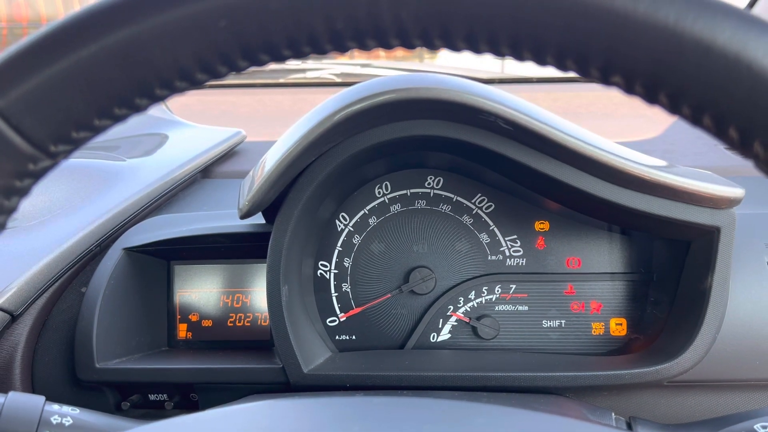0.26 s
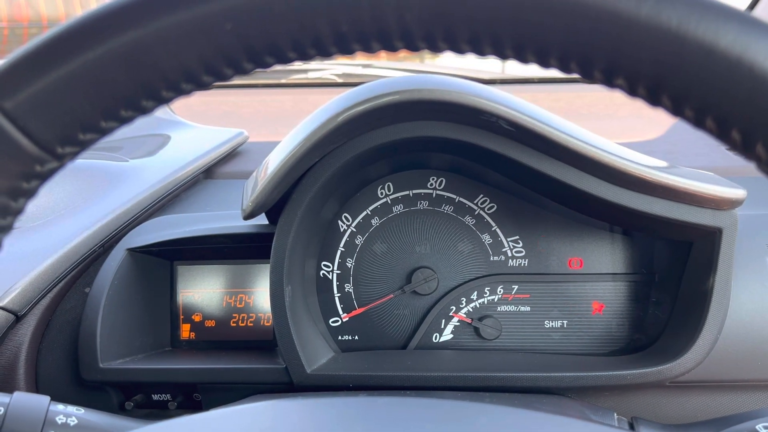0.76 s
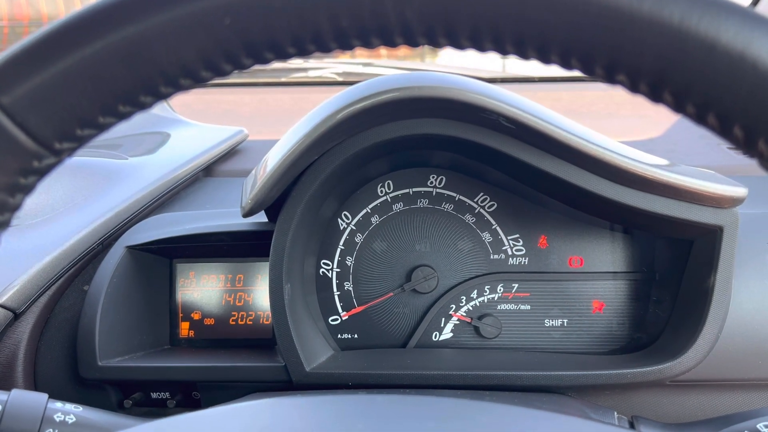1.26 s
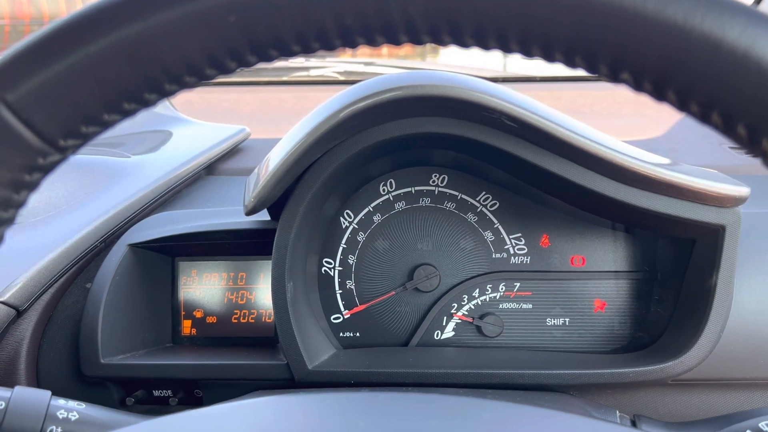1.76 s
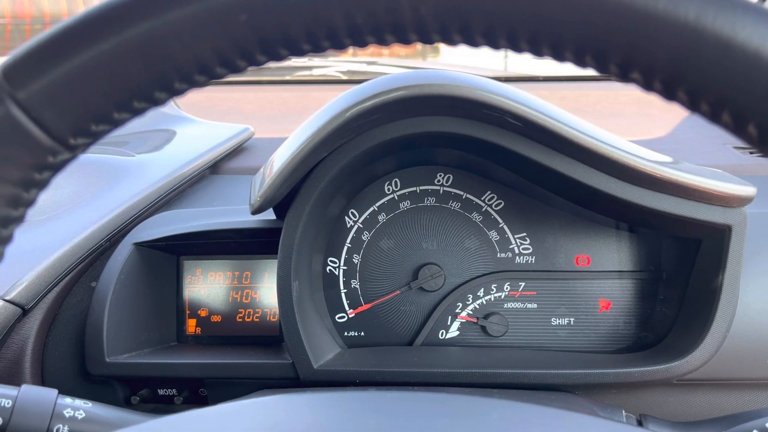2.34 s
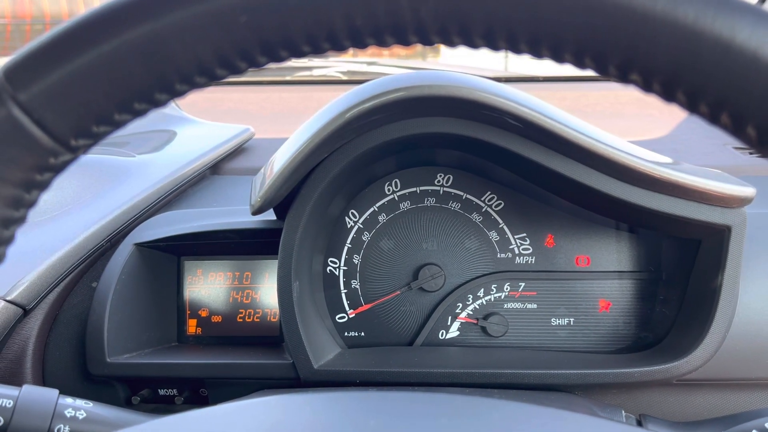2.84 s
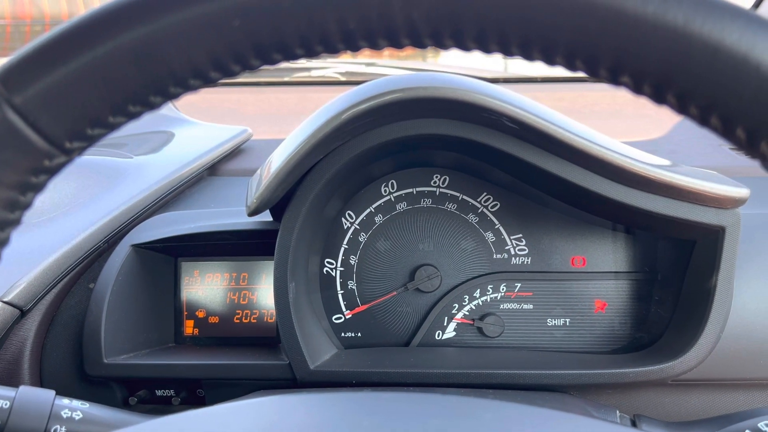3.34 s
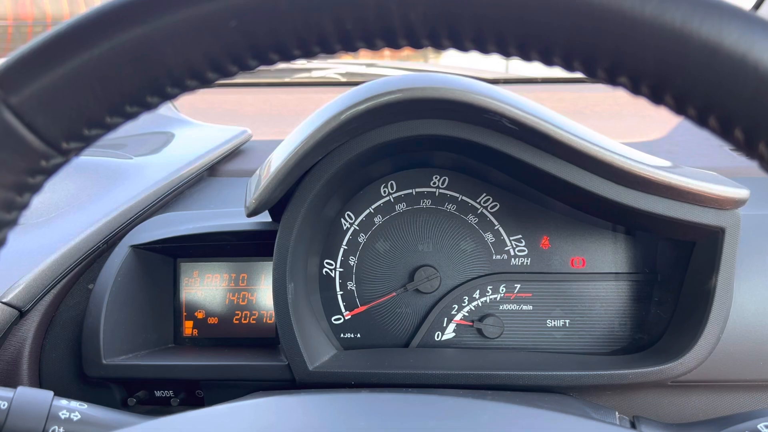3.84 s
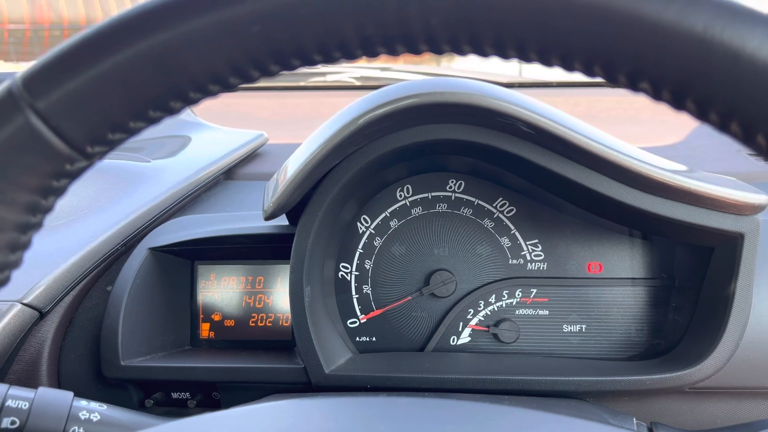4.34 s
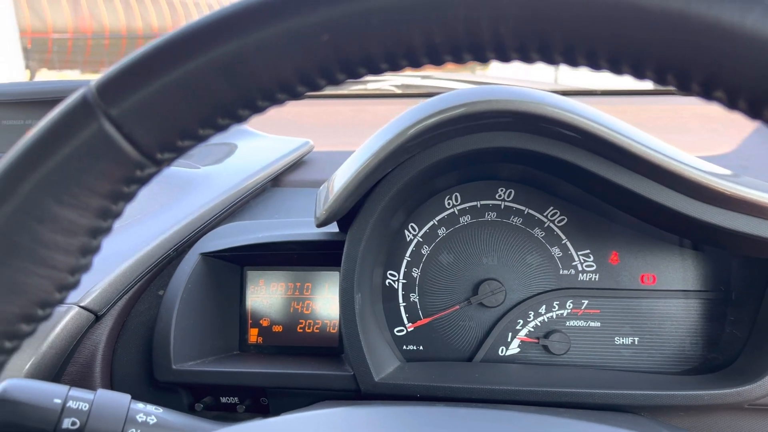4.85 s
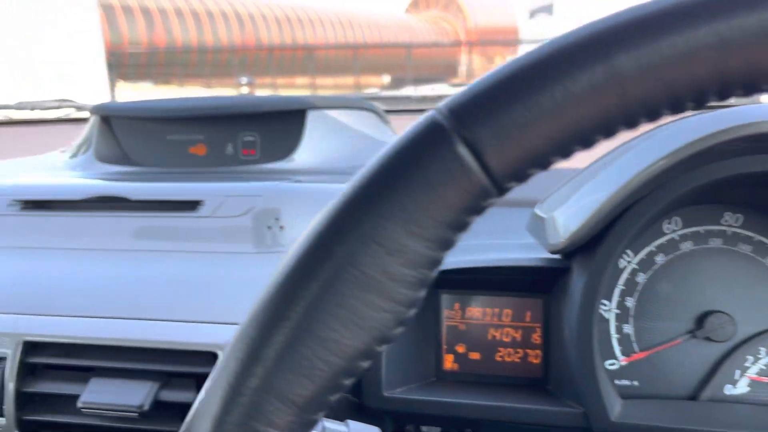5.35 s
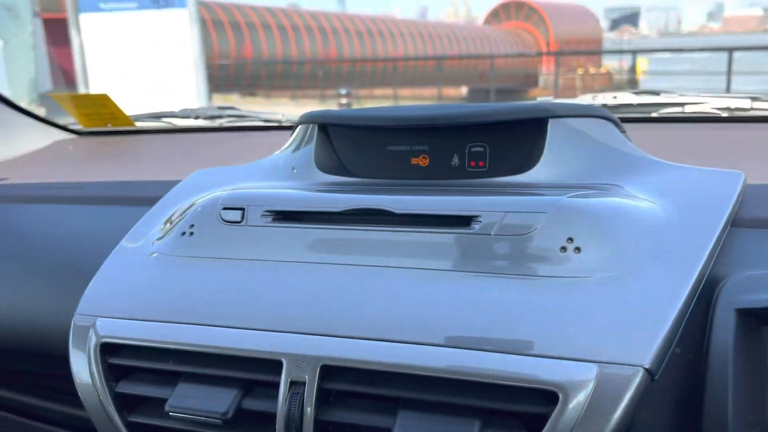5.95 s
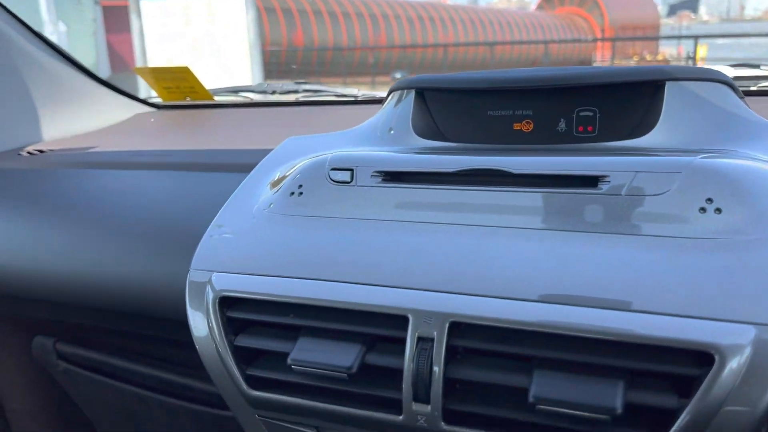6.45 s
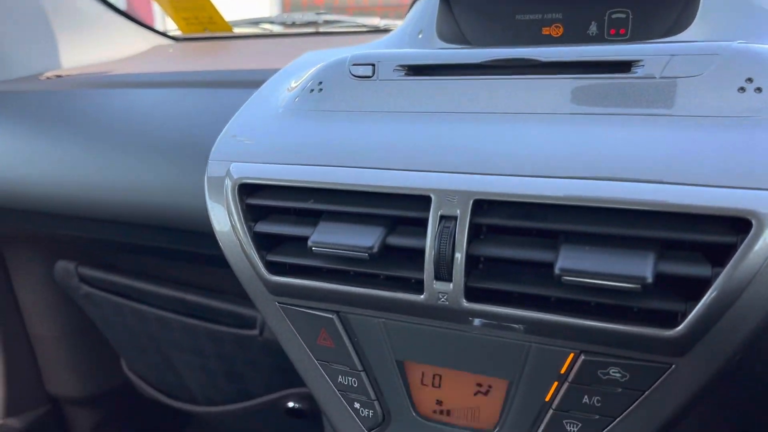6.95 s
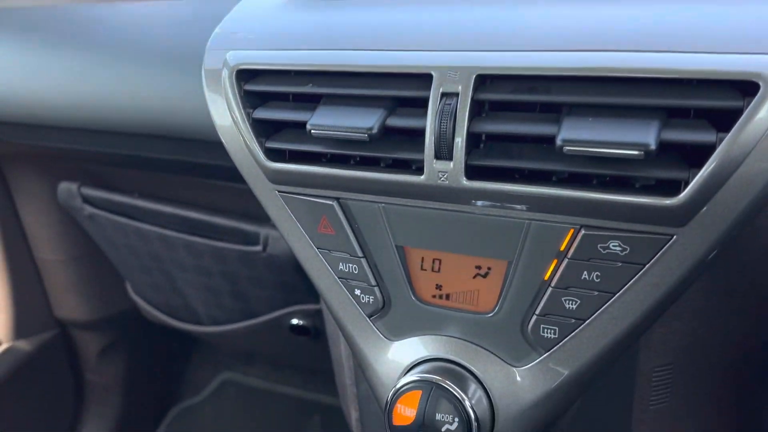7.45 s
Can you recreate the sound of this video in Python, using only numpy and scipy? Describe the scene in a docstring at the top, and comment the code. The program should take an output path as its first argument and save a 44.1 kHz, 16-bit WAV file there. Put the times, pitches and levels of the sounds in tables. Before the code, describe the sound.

From the driver's seat of a small parked car, a three-cylinder engine runs at a fast cold idle, low and muffled with soft clatter and faint ticks at left. After a second the heater fan swells into a broad airy rush. The engine gradually slows and thumps unevenly in brief spells, while the handheld stereo microphone turns towards the centre vents. The air becomes fuller, and dull low knocks close it.

```python
"""A small three-cylinder engine settles from a fast cold idle, heard from the driver's seat.
Sine lines at multiples of crank speed slide down through body resonances, over noise clatter and struck thuds;
faint ticks ring short modes on the left. After a second the heater blower spins up: shaped noise rushes from
the vents, with breathy duct tones. The engine lopes in three short spells and the microphone swings towards
the centre vents. A few dull knocks, decaying low sines, come at the end."""
import sys
import numpy as np
from scipy import signal
from scipy.fft import rfft, irfft, next_fast_len
from scipy.io import wavfile

SR = 44100
rng = np.random.default_rng(int(sys.argv[2]) if len(sys.argv) > 2 else 0)


def dump(signal):
    """Clip the signal to [-1, 1] and save it as 16-bit WAV at the path in sys.argv[1]."""
    limited = np.clip(np.atleast_2d(signal).T, -1, 1)
    pcm = np.round(limited * 32767).astype(np.int16)
    wavfile.write(sys.argv[1], SR, pcm)


N = 339746

# crank speed as the cold idle settles: (time [s], speed [rpm])
SPEED = [(0, 1815), (.5, 1715), (.9, 1650), (1.5, 1490), (2.1, 1350), (2.4, 1280), (2.7, 1240), (3.3, 1210),
         (3.6, 1185), (3.9, 1140), (4.2, 1085), (4.4, 1020), (4.7, 970), (5.1, 920), (5.3, 893), (5.5, 875),
         (6.4, 815), (6.8, 810), (7.7, 820)]
# floor-pan and cavity modes, struck by firings and thumps: (pitch [Hz], level [dB], t60 [s])
BODY_MODES = [(75.4, -1, 0.18), (81, -1.5, 0.18), (86.6, -4.5, 0.24), (102, -9.5, .15), (136, -9, 0.054),
              (153.2, -5, 0.15), (179.3, -3.5, 0.2), (203.7, -11, 1)]
# how sound reaches the two microphone ports, from the side vents (also used for the body roar) and the centre:
# (frequency [Hz], likeness [0-1], right lead [rad], left minus right [dB])
SIDE_IMAGE = [(78, 1, 0, -1.3), (167, 1, 0.66, -0.5), (284, 0.99, -0.17, -1.3), (446, 0.75, -1.5, 6.5),
              (700, 0.74, 0.42, -4), (940, 0.58, -3, -1), (1400, 0.12, -2.5, 1.5), (1910, 0.29, -2.5, 2.5),
              (2800, 0.26, -1, -1.7), (4200, 0.33, -0.3, 2.5), (6500, 0.69, 1, 0.5), (8000, 0.85, 0.5, 1.5),
              (8700, 0.92, 2, 0.2), (13000, 0.88, -1, 1.5)]
CENTRE_IMAGE = [(80, 1, -2, -1), (170, 0.85, 0.3, 0.5), (294, 0.9, -0.09, 0.5), (450, 0.75, 0.5, 0.5),
                (690, 0.7, -0.6, -8.5), (1020, 0.56, -0.1, 2), (1350, 0.54, 0, 0.5), (1900, 0.4, 0.9, 0.4),
                (2820, 0.87, -1.64, 1.5), (4270, 0.63, -1.2, 3), (6500, 0.57, 0.4, -1),
                (7950, 0.82, -0.1, 1), (9000, 0.86, 3, 0), (13000, 0.88, 0.5, 0)]
# microphone turning across the dash: (time [s], facing the centre vents [0-1])
FACING = [(0, 0.01), (5, 0.34), (5.5, 0.59), (6, 0.93), (6.45, 0.96), (6.65, 0.99), (7.7, 0.99)]
WARM_RPM = 800   # reference speed for the engine levels
RUSH_DB_PER_OCT = 9   # rush and duct tones, per octave of airflow


def from_db(db):
    """Decibels to gain."""
    return 10 ** (np.asarray(db) / 20)


def rms_one(x):
    """Scale to rms 1."""
    return x / np.sqrt(np.mean(x ** 2) + 1e-20)


def in_time(rows):
    """Columns of a curve table, one value per sample."""
    s, *columns = np.transpose(rows)
    return [np.interp(np.arange(N) / SR, s, c) for c in columns]


def at_hz(rows, hz):
    """Columns of a frequency table, read on a log axis."""
    f, *columns = np.transpose(rows)
    return [np.interp(np.log(hz), np.log(f), c) for c in columns]


def drift(rate):
    """Slow chance of spread 1: noise twice through a one-pole low-pass at rate [Hz]."""
    # drawn at a fortieth of the sample rate, then interpolated; the first 4000 values let the filter settle
    r = np.exp(-80 * np.pi * rate / SR)
    noise = rng.standard_normal(N // 40 + 4002)
    slow = signal.lfilter([1], [1, -2 * r, r * r], noise)[4000:]
    return np.interp(np.arange(N) / 40, np.arange(len(slow)), rms_one(slow))


def ring(clicks, hz, t60):
    """A two-pole resonator: a unit click sets a decaying sine of initial height 1 ringing."""
    r = from_db(-60 / (t60 * SR))
    w = 2 * np.pi * hz / SR
    return signal.lfilter([0, np.sin(w)], [1, -2 * r * np.cos(w), r * r], clicks + 1e-18)


def stereo_noise(colour, image, ducts=()):
    """Coloured noise on both ports; the right one holds a phase-turned share of the left. Mid rms 1."""
    size = next_fast_len(N)
    hz = np.maximum(np.arange(size // 2 + 1) * SR / size, 1)
    level_db, = at_hz(colour, hz)
    for centre_hz, width_hz, lift_db in ducts:
        level_db = level_db + lift_db / (1 + (2 * (hz - centre_hz) / width_hz) ** 2)
    alike, lead, balance_db = at_hz(image, hz)
    alike = np.clip(alike, 0, 1)
    shared, own = rfft(rng.standard_normal((2, size)))
    left = shared * from_db(level_db + balance_db / 2)
    right = alike * np.exp(1j * lead) * shared + np.sqrt(1 - alike ** 2) * own
    right = right * from_db(level_db - balance_db / 2)
    pair = irfft(np.array([left, right]), size)[:, :N]
    return pair / np.sqrt(np.mean(pair.mean(axis=0) ** 2))


def crank_angle():
    """Crank phase in radians; the idle hunts a little around its set speed."""
    rpm = in_time(SPEED)[0] * (1 + 0.0025 * drift(3.33))
    return 2 * np.pi * np.cumsum(rpm / 60) / SR


def octaves_up():
    """Engine speed in octaves above the warm reference."""
    return np.log2(in_time(SPEED)[0] / WARM_RPM)


def airflow_octaves():
    """Blower airflow as octaves relative to full speed (0 at full, negative below)."""
    start_s, spin_up_s = 1.043, 0.34
    age = np.maximum(np.arange(N) / SR - start_s, 0) / spin_up_s
    airflow = 1 - np.exp(-age ** 2 / (1 + age))
    return np.log2(np.maximum(airflow, .05))   # a trickle remains before the start


def engine_orders(crank):
    """Clean lines on the main orders, wavering weaker ones between them; the right port leads a little."""
    # main lines, 1.5 being the firing rate, before line level and body gain:
    # (multiple of crank speed [ratio], level at warm reference [dB], slope [dB per octave of engine speed])
    main_orders = [(1.5, -49, 1), (2, -68, 6.5), (3, -50.5, 1), (3.5, -67.5, 12.5), (4.5, -46, 1),
                   (6, -51, 4.5), (6.5, -58.5, 6), (7.5, -50.5, -3), (9, -45, -14)]
    # unequal cylinders leave weaker orders between: (multiple of crank speed [ratio], relative level [dB])
    side_orders = [(2.5, -12), (4, -6), (5, -1), (5.5, -4), (7, -3), (8, -4), (8.5, -7), (10, -8), (11, -3)]
    # level of the clean lines: (time [s], level [dB])
    line_level = [(0, 3), (.3, -3.5), (.47, -5.5), (.75, 1.5), (1.7, 2.5), (2.2, -1.5), (2.6, -0.5),
                  (3.3, 2.5), (3.6, -9), (3.9, 6.5), (4.3, -2.5), (4.9, 0), (5.5, -2.5), (7.7, -1.5)]
    # how the body passes a low tone into the cabin: (frequency [Hz], gain [dB])
    body_gain = [(14, -26.5), (20, -12), (23, -6), (26.5, 11), (30, -6), (33, 8.5), (36, 11.5), (40, 13.5),
                 (46, 5), (52, 3), (55, -8.5), (58, -7), (60.5, 2.5), (62, 6), (67, 3), (72, 0.5),
                 (78, -3.5), (84, 1.5), (90, -10), (97, -11), (108, -11.5), (120, -7.5), (132, 0), (145, 1),
                 (160, -4.5), (180, 0), (215, -4.5)]
    turns_hz = in_time(SPEED)[0] / 60
    line_db, = in_time(line_level)
    up = octaves_up()
    lead = np.array([[-.09], [.09]])   # left, right [rad]
    out = np.zeros((2, N))
    for order, level_db, slope_db in main_orders:
        level_db = level_db + line_db + slope_db * up + at_hz(body_gain, order * turns_hz)[0]
        # the lines stay nearly in step, so that each firing is felt as a beat
        phase = order * crank + rng.normal(0, .5) + lead
        out -= from_db(level_db + 1.4 * drift(2.0)) * np.cos(phase)
    uneven_db = -49.5 - 12 * up
    for order, level_db in side_orders:
        # no two burns are alike, so these lines swell and fade on their own
        phase = order * crank + rng.uniform(0, 2 * np.pi) + lead
        out += from_db(uneven_db + level_db + 3.0 * drift(0.64)) * np.sin(phase)
    # the bulkhead lets little through above the body modes
    out = signal.sosfilt(signal.butter(4, 235, fs=SR, output="sos"), out)
    return np.sqrt(2) * out * from_db([[-.3], [.3]])


def shake(crank):
    """The block shakes once per crank turn, a soft low sine that is strongest while the idle is fast."""
    # (time [s], level [dB rms])
    shake_level = [(0, -45), (.5, -61), (.9, -43.5), (1.3, -39), (1.75, -46), (2.1, -62), (2.8, -68.5),
                   (7.7, -80.5)]
    return np.sqrt(2) * from_db(in_time(shake_level)[0]) * np.sin(crank + rng.uniform(0, 2 * np.pi))


def panel_hum():
    """A floor panel hums: a nearly clean low sine that surges and slides in pitch."""
    # (time [s], pitch [Hz], level before the slow chance [dB rms])
    hum_curve = [(.3, 77.9, -61), (.85, 76.46, -45), (1.2, 75.15, -44), (1.6, 70.7, -46),
                 (2.1, 71.4, -71.5), (3.55, 76.43, -72), (3.85, 75.7, -50), (4.3, 73.76, -41),
                 (4.55, 71.06, -49), (4.9, 70.4, -34), (5.15, 68.7, -40), (5.4, 69, -70)]
    hz, level_db = in_time(hum_curve)
    phase = 2 * np.pi * np.cumsum(hz) / SR + rng.uniform(0, 2 * np.pi)
    return np.sqrt(2) * from_db(level_db + 2.9 * drift(4)) * np.sin(phase)


def rumble(crank):
    """A noise roar in the body that rises with the blower, and an uneven soft thud from every firing."""
    # (frequency [Hz], density [dB per Hz])
    roar_colour = [(12, -70), (30, -38), (48, -15), (80, 1.5), (125, -6), (165, -4), (195, -11.5),
                   (235, -21.5), (300, -53), (500, -120)]
    roar_db = -46.5 + 7 * 2 ** airflow_octaves()   # 7 dB lift at full airflow
    thud_db = -44 - 5.5 * octaves_up()
    fired = np.diff(np.floor(1.5 * crank / (2 * np.pi)), prepend=0) > 0
    # a steady part and a chance felt by all modes; each mode then adds its own chance
    push = fired * (.8 * rng.standard_normal(N) - 1.3)
    thuds = np.zeros(N)
    for hz, level_db, t60 in BODY_MODES:
        thuds += from_db(level_db) * ring(push + fired * rng.standard_normal(N), hz, t60)
    thuds = rms_one(signal.sosfilt(signal.butter(4, 260, fs=SR, output="sos"), thuds))
    # the left port hears them 18 samples later
    thuds = np.array([np.roll(thuds, 18), thuds]) * from_db([[-.5], [.5]])
    roar = from_db(roar_db) * stereo_noise(roar_colour, SIDE_IMAGE)
    return roar + from_db(thud_db) * thuds


def engine_bay(crank):
    """Valve and intake clatter: coloured noise that pulses slightly at the firing rate."""
    # (frequency [Hz], density [dB per Hz])
    bay_colour = [(40, -60.5), (150, -24.5), (260, -1), (360, -3.5), (392, -4.5), (442, -17.5), (515, -6),
                  (665, -11.5), (700, -11.5), (1210, -14.5), (1340, -19.5), (1820, -13), (2200, -21.5),
                  (2480, -30), (3600, -38), (4440, -41.5), (4910, -44.5), (15400, -68.5)]
    # how the bay reaches the ports:
    # (frequency [Hz], likeness [0-1], right lead [rad], left minus right [dB])
    bay_image = [(80, 0.99, 0.2, -0.6), (170, 0.99, 0.5, -1.1), (300, 0.71, 0.2, -0.1),
                 (450, 0.4, 0.0, 0.3), (680, 0.6, 0.1, -3.9), (1000, 0.37, -2.0, -0.8),
                 (1350, 0.03, 1.0, 4.5), (1900, 0.61, -2.1, 11.6), (2800, 0.04, -1.5, 7.8),
                 (4200, 0.24, -1.0, 13.9), (6500, 0.32, 0.3, 5.0), (7800, 0.41, 0.8, 4.9),
                 (9000, 0.39, 1.7, 0.2), (13000, 0.73, 0.0, -0.0)]
    # a faint rough whine, a dip and a hiss peak: (centre [Hz], width [Hz], lift [dB])
    bay_peaks = [(4535, 200, 11), (5340, 750, -4), (7170, 1400, 8)]
    level_db = -60.5 + 5.5 * octaves_up() + .5 * drift(3.7)
    pulse = 1 + .05 * np.cos(1.5 * crank)
    return from_db(level_db) * pulse * stereo_noise(bay_colour, bay_image, bay_peaks)


def ticking():
    """Each tick, and two weaker bounces after it, strike a few short modes with strengths of its own."""
    # faint ticks on the left, in short runs, as from a small valve: (time [s], strike level [dB])
    tick_times = [(.092, -66), (.132, -64), (.172, -68), (.212, -67), (.722, -63), (.762, -66), (.785, -65),
                  (.808, -64), (.85, -62), (.89, -63), (1.051, -66), (1.09, -60.5), (1.13, -63),
                  (1.17, -67), (1.36, -61), (1.4, -62), (1.45, -69), (1.69, -64), (1.73, -69)]
    # (pitch [Hz], level [dB], t60 [s])
    tick_modes = [(2550, 4, .012), (2850, 3, .011), (3200, 1, .01), (3550, 1, .01), (3900, 0, .009),
                  (4250, -1, .009)]
    s, strike_db = np.transpose(tick_times)
    first_bounce = s + rng.uniform(.012, .02, len(s))
    second_bounce = s + rng.uniform(.022, .036, len(s))
    s = np.r_[s, first_bounce, second_bounce]
    strike_db = np.r_[strike_db, strike_db - 4, strike_db - 7]
    strengths_db = rng.normal(0, 1.8, (len(s), len(tick_modes)))
    smear = rng.uniform(0, .0015, strengths_db.shape)   # the modes do not start together [s]
    out = np.zeros(N)
    for k, (hz, level_db, t60) in enumerate(tick_modes):
        clicks = np.zeros(N)
        at = ((s + smear[:, k]) * SR).astype(int)
        clicks[at] = from_db(strike_db + level_db - 5 + strengths_db[:, k])
        out += ring(clicks, hz, t60)
    muffled = signal.sosfilt(signal.butter(4, [2300, 4500], "band", fs=SR, output="sos"), out)
    return muffled * from_db([[4], [-9]])


def blower():
    """Turbulent air through the ducts: noise from two groups of vents, louder and brighter with airflow."""
    # colour of each group of vents: (frequency [Hz], density [dB per Hz])
    side_vents = [(40, -66.5), (120, -34.5), (200, -12), (231, -11), (309, 1.5), (364, -11.5), (437, -15.5),
                  (676, -11.5), (1110, -12.5), (1400, -16.5), (3350, -33), (5680, -44), (8020, -46),
                  (8950, -45.5), (10300, -84), (15400, -62)]
    centre_vents = [(40, -76), (120, -45.5), (200, -12), (293, 4.5), (371, -10.5), (506, -10.5),
                    (782, -16.5), (1230, -15.5), (1350, -16.5), (1910, -18.5), (5680, -36), (8170, -44),
                    (9110, -37.5), (9980, -86.5), (12900, -54.5), (15400, -57)]
    # duct resonances and dips: (centre [Hz], width [Hz], lift [dB])
    side_duct = [(656, 70, 1.5), (580, 32, -5.5), (950, 54, 1), (1120, 60, -8), (1210, 60, 2),
                 (1300, 50, -6.5), (1390, 150, 1), (1840, 87, -2.5), (2000, 1200, 3), (2065, 46, 3),
                 (2160, 54, 4.5), (2270, 90, -5.5), (2500, 70, -6.5), (2490, 71, 7.5), (2670, 82, -7),
                 (2750, 90, 4.5), (2920, 72, -8.5), (3410, 57, 6.5), (4560, 810, 2.5), (5650, 1300, -7)]
    centre_duct = [(667, 97, 5.5), (790, 40, -1.5), (955, 200, 5), (1320, 87, -2.5), (1410, 27, 4.5),
                   (1490, 59, -6), (1535, 35, 6), (2170, 650, -2), (3450, 130, 1), (4670, 1800, 1),
                   (5750, 1780, -10.5)]
    flow, facing = airflow_octaves(), in_time(FACING)[0]
    # the air buffets lightly: half a dB of slow chance on each group
    side = from_db(-47 + 0.5 * drift(7)) * stereo_noise(side_vents, SIDE_IMAGE, side_duct)
    centre = from_db(-43.5 + 0.5 * drift(7)) * stereo_noise(centre_vents, CENTRE_IMAGE, centre_duct)
    # equal-power crossfade as the microphone turns
    air = from_db(RUSH_DB_PER_OCT * flow) * (np.sqrt(1 - facing ** 2) * side + facing * centre)
    treble = signal.sosfiltfilt(signal.butter(2, 5000, "high", fs=SR, output="sos"), air)
    treble_db = 2.5 + 14 * flow   # on top of the rush
    return air + (from_db(treble_db) - 1) * treble


def duct_tones():
    """Air noise held in narrow duct resonances, fluttering in level."""
    # breathy tones at full airflow, before flutter: (pitch [Hz], width [Hz], level facing away [dB],
    # level facing the centre vents [dB], narrowness of the beam [exponent])
    tones = [(310.6, 30.3, -61, -55, 5), (400, 55, -75.5, -75.5, 2), (510, 45, -71.5, -55.5, 7),
             (552, 33, -68, -58, 4.8), (660, 54, -66, -65, 2), (1217, 49, -76.5, -56, 13),
             (1234, 88, -80.5, -59.5, 14), (1956, 350, -80.5, -58.5, 5.7)]
    # single tones swell for a moment: (centre time [s], pitch [Hz], length [s], added level [dB])
    tone_swells = [(2.84, 308, 0.62, -47), (3.846, 308, 0.18, -52.5), (3.905, 548, 0.54, -58.5),
                   (5.5, 405, 0.79, -58), (5.547, 548, 0.6, -54), (5.952, 308, 0.87, -51)]
    # band shape: (offset from the pitch [widths], level [dB])
    skirts = [(-5, -140), (-2, -30), (-.5, -4), (0, 0), (.5, -4), (2, -30), (5, -140)]
    t, facing = np.arange(N) / SR, in_time(FACING)[0]
    flow_db = RUSH_DB_PER_OCT * airflow_octaves()
    out = 0
    for hz, width_hz, away_db, facing_db, focus in tones:
        band = [(hz * np.exp(k * width_hz / hz), db) for k, db in skirts]
        beam_db = away_db + (facing_db - away_db) * facing ** focus
        gain = from_db(beam_db + flow_db + 0.8 * drift(0.59))
        for s, swell_hz, length, db in tone_swells:
            if abs(np.log2(swell_hz / hz)) < .05:   # the swell belongs to this tone
                gain = gain + from_db(db) * np.exp(-(2 * (t - s) / length) ** 2)
        flutter = from_db(2.5 * drift(7))
        out = out + gain * flutter * stereo_noise(band, CENTRE_IMAGE)
    return out


def lope(crank):
    """For a while the engine rocks on its mounts and thumps the body modes once per crank turn."""
    # spells of loping: (start [s], length [s], thump strength before chance and filtering [dB])
    lope_spells = [(3.049, 0.36, -35), (3.74, 0.55, -31.5), (4.592, .72, -31.5)]
    t, thumps = np.arange(N) / SR, np.zeros(N)
    for s, length, strength_db in lope_spells:
        turn = np.floor((crank - crank[int(s * SR)]) / (2 * np.pi))
        new_turn = np.diff(turn, prepend=turn[0]) > 0
        thumps += from_db(strength_db) * new_turn * (t < s + length) * (turn >= 0)
    thumps = thumps * from_db(3 * rng.standard_normal(N))   # thump-to-thump change
    body = np.zeros(N)
    for hz, level_db, t60 in BODY_MODES:
        body += from_db(level_db) * ring(thumps, hz, t60 / 2)   # half the ring of a firing
    return signal.sosfilt(signal.butter(2, [70, 104], "band", fs=SR, output="sos"), body)


def knocks():
    """Soft blows through the body: low panel sines with a soft onset and an exponential decay."""
    # (time [s], level before the onset swell [dB], pitch [Hz], t60 [s])
    blows = [(7.529, -23.5, 60.6, 0.54), (7.601, -9, 58, 0.12), (7.637, -3, 121, 0.035),
             (7.647, -5, 77, 0.079)]
    out = np.zeros(N)
    for s, level_db, hz, t60 in blows:
        age = np.maximum(np.arange(N) / SR - s, 0)
        onset = (1 - np.exp(-age / 0.004)) ** 2
        decay = from_db(level_db - 60 * age / t60)
        out -= onset * decay * np.sin(2 * np.pi * hz * age)
    return out


def scene():
    """Everything in the cabin."""
    # the low engine sound leans slightly right, then left: (time [s], left minus right [dB])
    engine_pan = [(0, 0), (2, 0), (3.5, -0.5), (5, -1), (5.6, 0), (7.7, 2)]
    crank = crank_angle()
    lows = engine_orders(crank) + shake(crank) + panel_hum() + rumble(crank) + lope(crank)
    lows = lows * from_db(in_time(engine_pan)[0] * [[.5], [-.5]])
    return lows + engine_bay(crank) + ticking() + blower() + duct_tones() + knocks()


def record(dry):
    """A very short fade-in; the microphone loses the deepest bass, then the top is cut."""
    fade = np.sin(np.pi / 2 * np.minimum(np.arange(N) / (.008 * SR), 1)) ** 2
    dry = signal.sosfilt(signal.butter(2, 12, "high", fs=SR, output="sos"), dry)
    # 60 dB down from 15.6 kHz
    return signal.sosfilt(signal.cheby2(16, 60, 15600, fs=SR, output="sos"), dry * fade)


dry = scene()
out = record(dry)
dump(out)
```